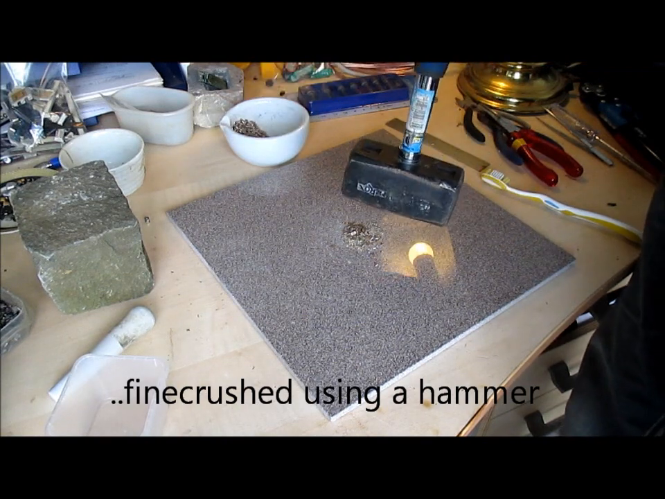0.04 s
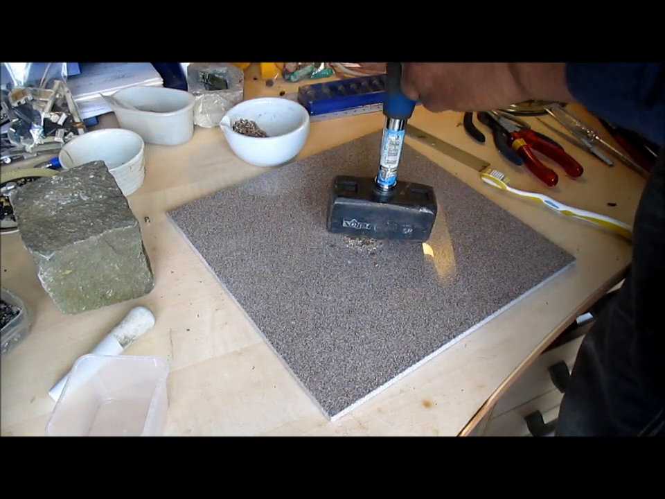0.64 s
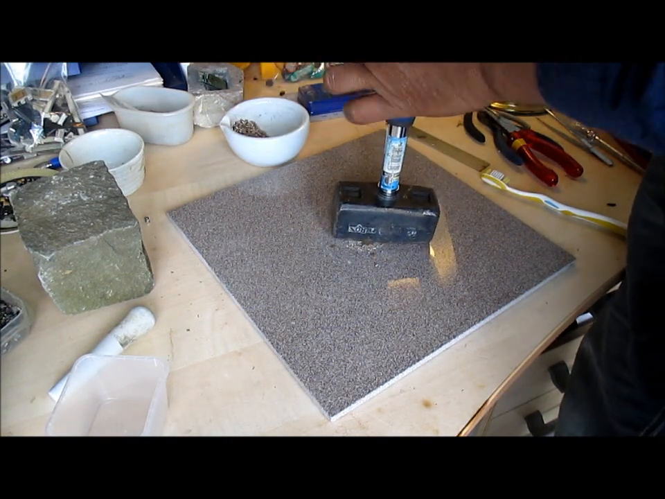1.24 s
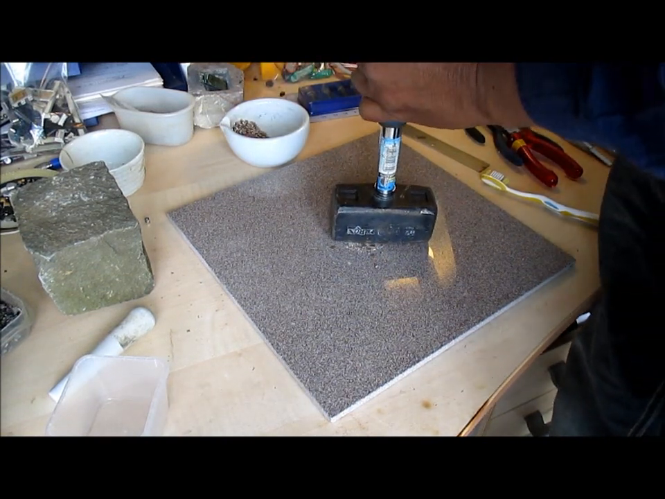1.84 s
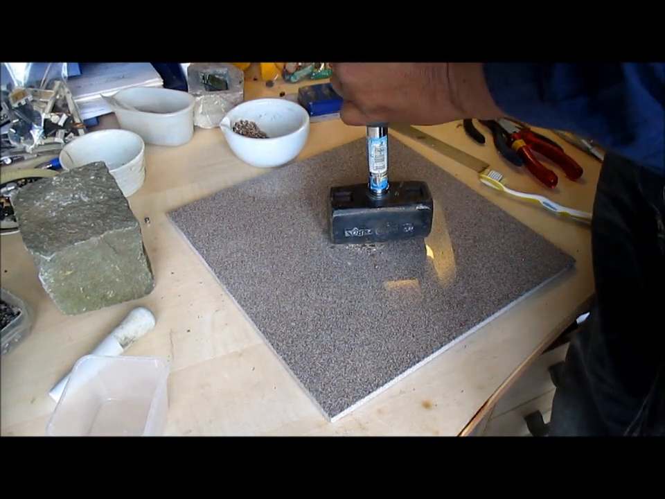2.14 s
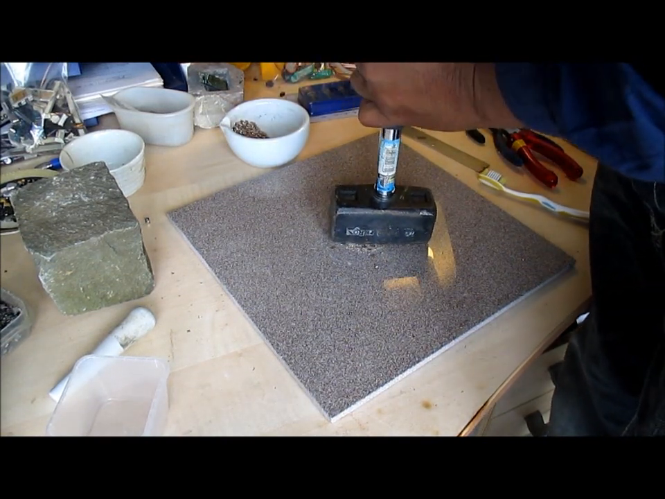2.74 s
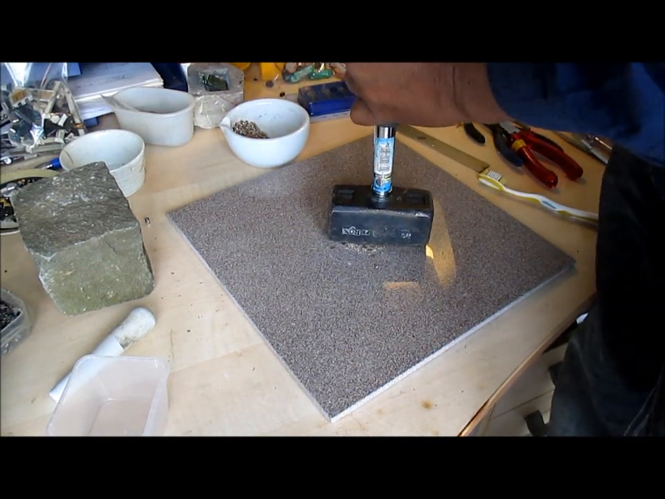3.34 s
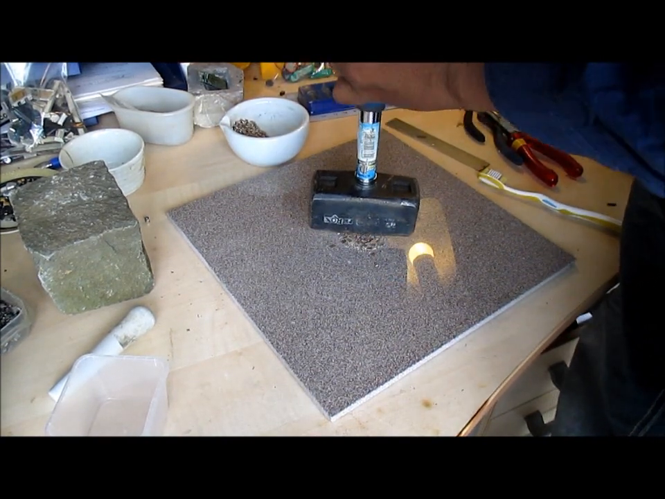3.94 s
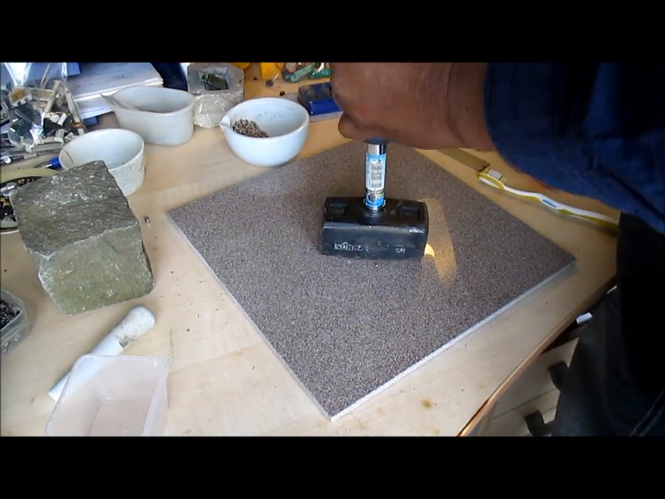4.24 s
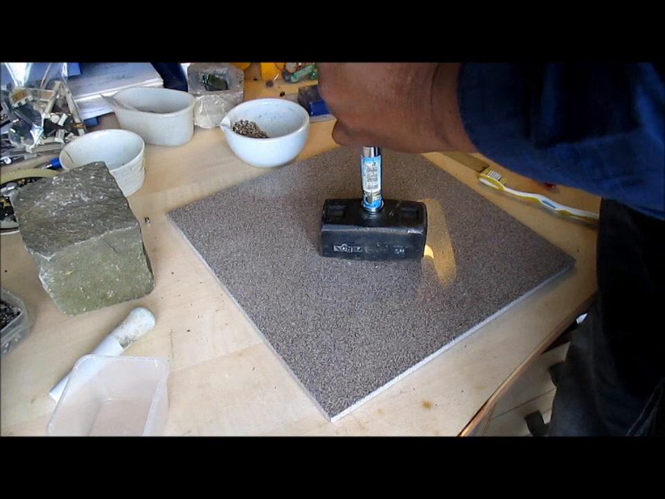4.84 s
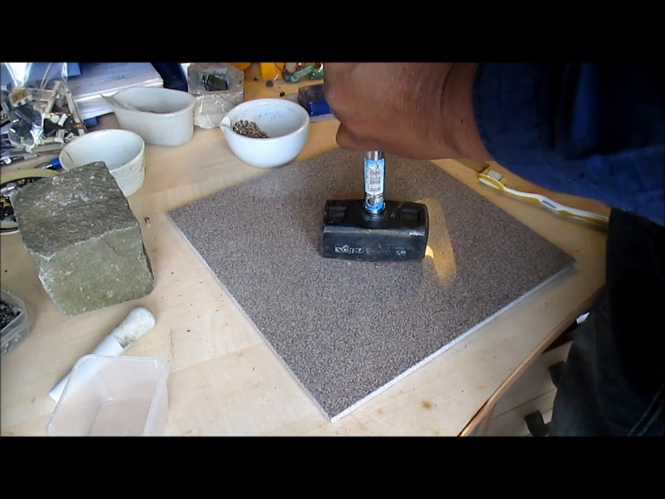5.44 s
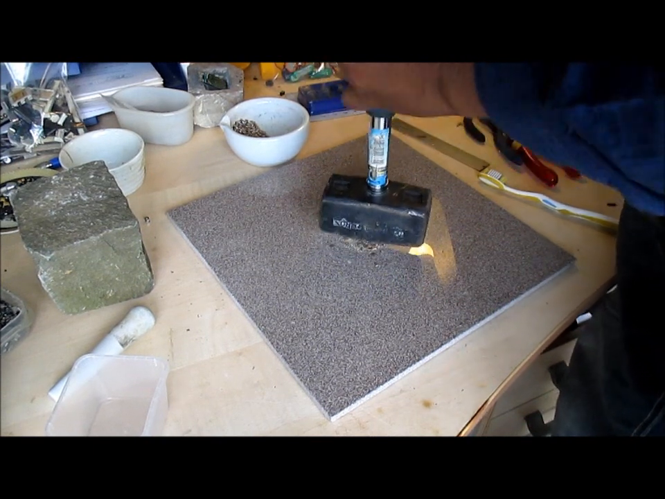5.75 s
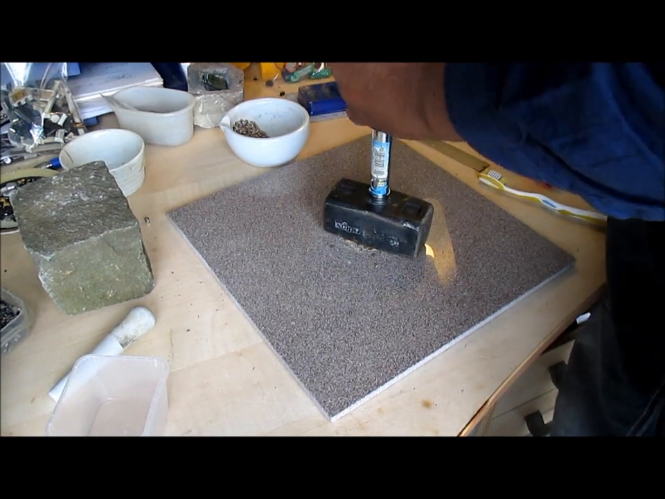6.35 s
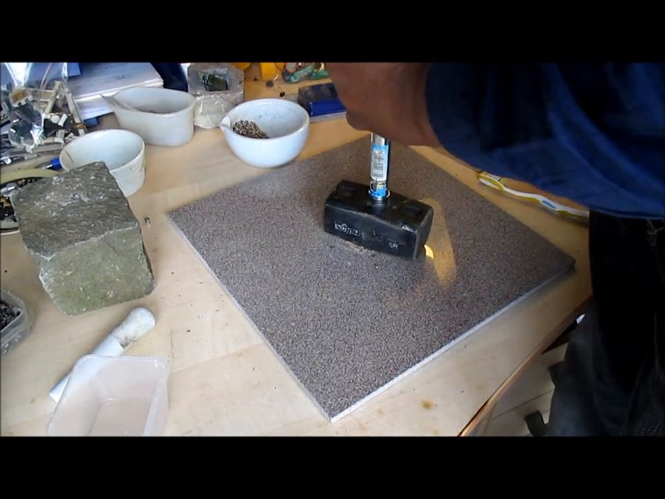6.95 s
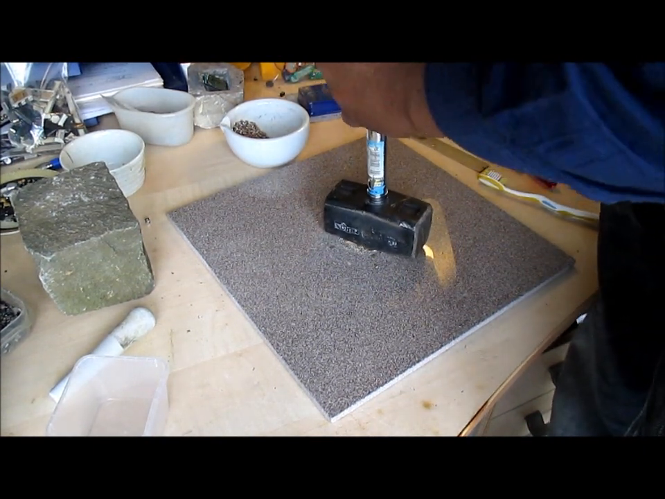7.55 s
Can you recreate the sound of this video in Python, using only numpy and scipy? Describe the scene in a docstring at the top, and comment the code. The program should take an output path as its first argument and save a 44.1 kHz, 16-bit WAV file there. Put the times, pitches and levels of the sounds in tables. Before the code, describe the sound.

Soft room tone opens, close up in a small workshop. From about 0.9 seconds a heavy steel hammer head taps lightly on scrap on a stone slab, then lands at 1.35 with a thud, a bright clink and a short boom from the wooden bench. From 1.5 to 3.6 it presses and rocks: brittle pieces snap and crumble in dense, uneven, gritty crackles, with a few duller knocks and a faint grumble. After a short lull the head lands hard again at 4.25, followed by sparser crunching and a sharp crack near 5.3. Another brief pause leads to a third clinking landing at about 6.2, then steady irregular snapping and grinding until the end at about 7.6. Each snap rings briefly in steel and stone with a short room echo. A faint thin sizzle rises around the main landings.

```python
"""A heavy hammer head crushes brittle scrap on a stone slab: set down three times, pressed and rocked.
Pieces snap and crumble to grit, and every snap rings steel and stone, tinted by how the head sits.
Each landing thuds, knocks and rattles the loose bits; the slab rings and the wooden bench booms below.
Bare steel clinks on stone, and the rolling head grumbles. Behind it sit a thin sizzle, soft room tone
and the short echo of a small workshop. The perspective is close and nearly mono."""
import sys
import numpy as np
from scipy import signal
from scipy.fft import rfft, irfft
from scipy.io import wavfile

SR = 44100
rng = np.random.default_rng(int(sys.argv[2]) if len(sys.argv) > 2 else 0)


def master(y):
    """Save y as 16-bit WAV."""
    cut = np.clip(np.atleast_2d(y).T, -1, 1)
    pcm = np.round(cut * 32767)  # scale
    wavfile.write(sys.argv[1], SR, pcm.astype(np.int16))


N = 334719
TIME = np.arange(N) / SR

# colour of the room tone: (frequency [Hz], density [dB])
ROOM_TONE_COLOUR = [(30, -11), (59, -9), (245, -6), (473, -3.5), (962, -8.5), (1190, -11), (2230, -16.5),
                    (2900, -18.5), (3580, -18.5), (4080, -21.5), (16000, -44)]
# the room tone sinks under the work and creeps back in the pauses: (time [s], level [dB])
ROOM_TONE_FADER = [(0, -47), (1.4, -43), (3.6, -56.5), (4.25, -46.5), (5.15, -55.5), (6.12, -47),
                   (6.25, -51), (7.59, -49.5)]
# colour of the microphone hiss: (frequency [Hz], density [dB])
HISS_COLOUR = [(30, 9), (200, 16), (1000, -35.5), (5000, 15.5), (10000, 17.5), (16000, 16.5)]
# colour of the thin sizzle: (frequency [Hz], density [dB])
SIZZLE_COLOUR = [(100, -49), (1500, -12), (2500, -9.5), (3600, -11), (4300, -3), (5150, -9.5), (5800, -22),
                 (9000, -30), (16000, -60)]
# swells of sizzle around the landings: (start [s], length [s], level [dB])
SIZZLE_CUES = [(1.41, 0.89, -48.5), (4.015, 0.43, -49), (4.394, 0.073, -53.5), (6.056, 0.2, -47)]
# reverb of the workshop: (band centre [Hz], time to fall 60 dB [s], level [dB])
REVERB_BANDS = [(124, 0.19, -26), (332, 0.41, 5), (750, 0.22, 1), (1970, 0.38, -2.5), (3430, 0.58, -12),
                (6450, 0.33, -4.5), (13000, 0.19, -3)]
# modes of the wooden bench: (frequency [Hz], bandwidth [Hz], level [dB])
BENCH_MODES = [(57.5, 5.7, -10.5), (79.5, 11, -12), (119.3, 4.3, 4), (160.7, 3.6, 8), (193.4, 3.14, 9),
               (222.5, 27, -2.5), (278, 9.3, -4.5), (291.6, 13, -0.5), (333, 9, -5.5)]
# bending modes of the slab: (frequency [Hz], bandwidth [Hz], level [dB])
SLAB_MODES = [(404, 16, -5), (441, 17, -6), (511, 10, -1), (537, 14, -2), (654, 18, -7), (772, 8, 3),
              (865, 20, -2), (975, 18, -4), (1058, 15, 1), (1210, 18, -7), (1310, 12, -4), (1400, 13, -6),
              (1484, 11, -2), (1642, 20, -7), (1760, 16, -4), (2844, 30, -8), (2999, 25, -9)]
# modes of steel and stone pressed together: (frequency [Hz], bandwidth [Hz], level [dB])
CONTACT_MODES = [(358, 44, -11.5), (399, 31, -3), (493.4, 92, -0.5), (700, 225, 3.5), (908, 442, 0.5),
                 (1262, 176, 3.5), (1560, 220, 1), (1854, 297, -1.5), (2386, 376, -3.5), (2810, 394, 3.5),
                 (3233, 604, 2), (3830, 777, -1), (4450, 277, -3), (4820, 118, -5.5), (5580, 150, -8),
                 (6120, 140, -14.5), (6560, 113, -5), (7400, 150, -17.5), (7870, 80, -10),
                 (8430, 66, -14.5), (8950, 86, -14), (9850, 130, -17), (10270, 110, -19),
                 (10980, 70, -24.5), (11700, 40, -20.5), (11950, 60, -19.5), (12900, 92, -27),
                 (13800, 65, -42), (14600, 35, -57)]
# modes of the clinking head: (frequency [Hz], bandwidth [Hz], level [dB])
CLINK_MODES = [(2764, 93, -1.5), (2850, 140, -4), (3600, 110, -2.5), (3880, 85, -2), (4780, 100, -9.5),
               (5530, 140, -17)]
# bare steel touches stone: (time [s], level [dB])
CLINK_CUES = [(0.887, -23), (0.894, -15.5), (0.97, -23), (1.025, -18), (1.126, -12.5), (1.279, -23),
              (1.351, -4.5), (4.246, -0.5), (6.163, -11), (6.179, -6.5)]
# the head rolls under load: (start [s], length [s], level [dB], pitch [Hz])
ROLL_CUES = [(1.517, 0.3, -45.5, 120.5), (2.166, 0.15, -43, 196), (3.05, 0.3, -54, 161.7),
             (6.07, .08, -43, 403), (6.097, 0.081, -37.5, 537)]
# the head lands or tips: (time [s], thud [dB], knock pitch [Hz], knock [dB],
# slab focus [Hz], slab [dB], bench [dB], bench focus [Hz])
LANDING_CUES = [(0.889, -18.5, 920, -23, 880, -19, -11.5, 65), (1.024, -11.5, 875, -11, 880, -11, -25, 281),
                (1.126, -12.5, 945, -15, 865, -12, -23.5, 142), (1.340, -6, 630, 0, 1050, -3, 1, 180),
                (1.351, 1.5, 1675, 5, 1650, -5, 3, 170), (1.355, -7, 1020, 0, 453, 5.5, -7, 322),
                (1.528, -7, 426, -9, 420, -10, -7, 320), (1.541, -5, 1080, -3.5, 1060, -8, -3, 115),
                (1.699, -14.5, 1670, -3.5, 1750, -15, -10, 113), (1.701, -12, 560, -6, 825, -5.5, -22, 160),
                (1.82, -14, 620, -28, 448, -23, -14, 120), (2.582, -13.5, 890, -7, 560, -16, -15, 165),
                (2.628, -6, 843, -1, 900, -7, -11.5, 126), (3.284, -12, 1160, -1.5, 1240, -10, -20, 165),
                (3.808, -27.5, 870, -26.5, 696, -27, -15.5, 169),
                (4.024, -29, 313, -13, 424, -24, -5.5, 306), (4.2447, -2, 426, 0, 510, 3.5, 0, 231),
                (4.2458, 1.5, 1620, 6.5, 1470, 2.5, -7, 77.5), (4.256, 2.5, 560, -3, 725, 9, -8, 164.5),
                (4.309, -5, 1200, -13, 1400, -9, -1.5, 171.5), (4.476, -2, 1100, -6.5, 801, -8, -12, 166),
                (5.328, -13, 1130, -16, 1200, -19, -11, 196), (5.723, -30, 700, -34, 500, -22, -13, 188),
                (6.06, -25, 586, -27, 420, -23, -8.5, 238), (6.162, -3, 453, 5, 500, 5.5, 1, 124.2),
                (6.177, 2.5, 1000, 6, 1025, -4, -2, 63.7), (6.222, -12, 430, -11, 420, -8, -1.5, 230),
                (6.259, -3.5, 940, -1, 540, -3, -16, 203)]
# the hand bears down on the head: (start [s], length [s], pressure [dB])
PUSH_CUES = [(1.504, 0.091, -4.5), (1.869, .18, -4.5), (2.252, 0.068, 0.5), (2.474, 0.13, -5),
             (2.805, 0.28, -8), (3.109, 0.25, -11), (4.437, 0.067, -3), (4.829, 0.13, -10),
             (6.238, 0.31, -13.5), (6.641, 0.08, -11), (6.731, 0.093, -9), (7.017, .14, -4.5),
             (7.248, 0.17, -7), (7.541, 0.042, -5.5)]
# the larger pieces snap: (time [s], relative level [dB], low-end weight [dB], crumbliness [0-1])
SNAP_CUES = [(0.893, -34, -19, 0.96), (1.129, -31, -28.5, 0.95), (1.279, -34, 0, 1), (1.352, -30, -4, 0.3),
             (1.381, -45, 3, 0), (1.514, -27.5, -1, 0.9), (1.529, -17.5, -6.5, 0.26),
             (1.541, -12.5, -10.5, 0.96), (1.558, -25, 5.5, 1), (1.613, -36, 6.5, 0.2),
             (1.79, -30, -26, 0.6), (1.873, -16, -1.5, 0.46), (1.908, -20.5, -10, 0.05),
             (1.915, -24.5, -4, 0), (1.929, -21.5, 1, 0), (1.944, -26.5, 5, 0.34), (1.971, -16, -6, 0.57),
             (1.988, -26, -15, 0.5), (2.017, -22, -7, 0.85), (2.051, -15, -6.5, 0.27),
             (2.117, -20, -12.5, 0.2), (2.193, -23.5, -5, 0.9), (2.254, -20, -8, 1),
             (2.267, -20.5, -8, 0.8), (2.277, -21, -11, 1), (2.289, -20.5, -5.5, 0.6),
             (2.359, -15.5, -14, 0.8), (2.365, -18.5, -9.5, 0.7), (2.406, -13.5, -7.5, 0.1),
             (2.455, -23, -10, 0.5), (2.459, -19.5, -5, 0.56), (2.506, -17, -8, 0),
             (2.514, -15.5, -7, 0.56), (2.527, -21, -5.5, 0), (2.533, -19, -5.5, 0),
             (2.560, -19.5, -10, 0.55), (2.570, -16, -4.5, 0), (2.581, -17, -2, 0), (2.609, -13, -9, .4),
             (2.617, -17.5, -4.5, 0), (2.738, -19.5, -10, 0.45), (2.805, -25.5, -5.5, 1),
             (2.82, -25, -9, 0.96), (2.851, -17.5, -7.5, 0.65), (2.935, -14.5, -14.5, 0.78),
             (2.938, -17.5, -3.5, 0.34), (2.989, -25, -4.5, 1), (3.025, -19, -18, 0),
             (3.035, -15, -6, 0.46), (3.109, -26, -7.5, 0.37), (3.137, -21, -8, 0.53),
             (3.144, -20, -5.5, 0.38), (3.18, -21, -5.5, 0.65), (3.214, -31, -8, 0.1),
             (3.223, -15, -9.5, 0.27), (3.283, -14.5, -5, 0.65), (3.319, -27, -19, 0.2),
             (3.330, -26.5, -9, 0.14), (3.361, -18, -8, 0.64), (3.556, -25, -10, 0.8),
             (3.585, -31, -6.5, 0.6), (4.025, -34, -1.5, 0.2), (4.247, -24, 0, 0.65),
             (4.461, -25.5, -7, 0.9), (4.474, -13, -8, 0.76), (4.482, -16.5, -16, 0), (4.503, -29, -5, 0.5),
             (4.546, -17.5, -8.5, 0.82), (4.701, -25.5, -17, 0.65), (4.738, -29.5, -11, 1),
             (4.787, -29, -15, 0.7), (4.849, -13, -14, 0.68), (4.865, -14, -9, 0.16),
             (5.119, -31.5, -8.5, 1), (5.3279, -10.5, -10.5, 0.85), (5.378, -28.5, -6, 0.3),
             (5.462, -30, -22, 0.84), (5.488, -27.5, -15, 1), (5.566, -32.5, -6.5, 1), (6.159, -27, 3, 1),
             (6.257, -14, -7, 0.3), (6.318, -16.5, -7, 0.05), (6.348, -13.5, -10, 0.4),
             (6.381, -27, -21, 0.7), (6.416, -15.5, -5.5, 0.8), (6.464, -15, -5, 0.13),
             (6.477, -15.5, -8.5, 0.2), (6.6772, -20, -6.5, 0.2), (6.740, -15, -9.5, 0.2),
             (6.755, -14.5, -13.5, 0), (6.775, -29, -8, 0.18), (6.800, -23.5, -8.5, 0.4),
             (6.824, -15, -4.5, 0.02), (6.832, -22.5, -19, 0), (6.93, -34, -10, 0.3),
             (6.967, -27.5, -5.5, 0.71), (6.997, -16.5, -6, 0.34), (7.032, -31, -13, 0.3),
             (7.056, -27, -12, 0.16), (7.071, -18.5, -7, 0.77), (7.095, -18, -7.5, 0.55),
             (7.108, -26, -14, 0.6), (7.127, -29, -9, 0.7), (7.137, -21.5, -19, 0), (7.164, -28, -10, 0.1),
             (7.205, -28, -9, 0.1), (7.237, -14.5, -10.5, 0.3), (7.274, -31, -10, 0.2),
             (7.306, -13.5, -12, 0.2), (7.386, -14, -7, 0.27), (7.503, -30.5, -5.5, 1),
             (7.57, -22.5, -5.5, 0.8)]


def undb(db):
    """Decibels to gain."""
    return 10 ** (np.asarray(db) / 20)


def unit(x):
    """Scale each sound to an energy of one."""
    return x / np.sqrt(np.sum(x ** 2, axis=-1, keepdims=True) + 1e-18)


def add(track, s, sound):
    """Mix a sound into a track at a time."""
    i = min(int(s * SR), N)
    track[i:i + len(sound)] += sound[:N - i]


def cut(x, hz, kind, order=2):
    """Low-pass or high-pass."""
    return signal.sosfilt(signal.butter(order, min(hz, SR / 2 - 1), kind, fs=SR, output="sos"), x)


def through(x, response):
    """Play a sound through an impulse response."""
    return signal.fftconvolve(x, response)[:N]


def noise(colour):
    """Coloured noise with an rms of one."""
    hz, db = np.transpose(colour)
    gain = undb(np.interp(np.log(np.fft.rfftfreq(N, 1 / SR) + 1), np.log(hz), db))
    return unit(irfft(rfft(rng.standard_normal(N)) * gain, N)) * np.sqrt(N)


def swell(start_s, length_s, attack_s, release_s):
    """Envelope that rises, holds and dies away."""
    since = TIME - start_s
    return np.clip(since / attack_s, 0, 1) * np.exp(-np.maximum(since - length_s, 0) / release_s)


def ring(modes):
    """Impulse response of damped modes; neighbours swing in opposite directions."""
    t = TIME[:SR // 2]
    response = 0
    for k, (hz, width, db) in enumerate(modes):
        gain = (-1) ** k * undb(db) * 2 * np.pi * width / SR
        response += gain * np.exp(-np.pi * width * t) * np.cos(2 * np.pi * hz * t)
    return response


def hard_attack(response):
    """The same colour with its energy packed at the start (minimum phase), as in a hard contact."""
    size = len(response)
    cepstrum = irfft(np.log(np.abs(rfft(response)) + 1e-4), size)
    cepstrum[1:size // 2] *= 2
    cepstrum[size // 2 + 1:] = 0
    return irfft(np.exp(rfft(cepstrum)), size)


def room_tone():
    """The soft rush of the room, riding slowly up and down."""
    fader_db = np.interp(TIME, *np.transpose(ROOM_TONE_FADER))
    return cut(noise(ROOM_TONE_COLOUR), 25, "high") * undb(fader_db)


def sizzle(attack_s=0.018, release_s=0.24):
    """A thin, even hiss comes up around the main landings and fades."""
    envelope = sum(undb(db) * swell(s, length, attack_s, release_s) for s, length, db in SIZZLE_CUES)
    return noise(SIZZLE_COLOUR) * envelope


def workshop_reverb(build_s=0.0016, scatter_db=-4, scatter_s=0.0058, scatter_hz=2200):
    """Impulse response: dull scatter off the cluttered bench top, then the room's short tail."""
    t = TIME[:int(SR * .7)]
    hz, t60, db = np.transpose(REVERB_BANDS)
    white = rfft(rng.standard_normal(len(t)))
    log_hz = np.log(np.fft.rfftfreq(len(t), 1 / SR) + 1)
    tail = 0
    for k, share in enumerate(np.eye(len(hz))):
        band = irfft(white * np.interp(log_hz, np.log(hz), share), len(t))
        envelope = unit(undb(-60 * t / t60[k]) * (1 - np.exp(-t / build_s)))
        tail += band * undb(db[k]) * envelope
    scatter = unit(rng.standard_normal(len(t)) * t * np.exp(-2 * t / scatter_s))
    return tail + undb(scatter_db) * cut(scatter, scatter_hz, "low", order=1)


def rolling(attack_s=0.067, release_s=0.07, q=13):
    """The head rolls over the scrap, and bench or slab grumbles around one mode."""
    bumps = rng.standard_normal(N)
    out = np.zeros(N)
    for start, length, db, hz in ROLL_CUES:
        mode = unit(cut(ring([(hz, hz / q, 0)]), 2 * hz, "low"))
        out += undb(db) * swell(start, length, attack_s, release_s) * through(bumps, mode)
    return out


def struck_spot(modes, focus_hz, octave_off_db):
    """The spot that is hit favours the modes near one pitch."""
    focused = [(hz, width, db + octave_off_db * np.log2(hz / focus_hz) ** 2) for hz, width, db in modes]
    return unit(ring(focused))


def slab_and_bench():
    """After each landing the slab rings on a few clear modes and the bench booms underneath."""
    out = np.zeros(N)
    for s, _, _, _, slab_hz, slab_db, bench_db, bench_hz in LANDING_CUES:
        slab = struck_spot(SLAB_MODES, slab_hz, octave_off_db=-70)
        bench = struck_spot(BENCH_MODES, bench_hz, octave_off_db=-14)
        add(out, s, cut(slab, 2 * slab_hz, "low") * undb(slab_db))
        add(out, s, cut(bench, 600, "low") * undb(bench_db))
    return out


def clinks(top_hz=5500):
    """Bare steel touches the stone and gives a short, bright ring."""
    out = np.zeros(N)
    clink = unit(cut(ring(CLINK_MODES), top_hz, "low"))
    for s, db in CLINK_CUES:
        add(out, s, clink * undb(db))
    return out


def debris(hardness, decay_s=0.026, spread_db=4, low_hz=1500, high_hz=3300):
    """Loose scrap rattles briefly under a landing head, louder after a hard blow."""
    t = TIME[:SR // 6]
    jolts, size = rng.standard_normal((2, len(t)))
    rattle = jolts * undb(spread_db * size) * np.exp(-t / decay_s)
    rattle = cut(cut(rattle, low_hz, "high"), high_hz, "low", order=5)
    return unit(rattle) * undb(-10 + 6 * hardness)


def fracture(decay_ms, crumble=0, crumble_s=0.0033, linger_s=0.007, spread_db=4):
    """A crack is a dying volley of tiny uneven breaks; a crumbly piece goes on breaking."""
    t = TIME[:SR // 30]
    jolts, size = np.moveaxis(rng.standard_normal(np.shape(crumble) + (2, len(t))), -2, 0)
    crack = np.exp(-t * 1000 / max(decay_ms, .1))
    crumbly = np.clip(np.asarray(crumble)[..., None], 0, 1)
    crumbling = crumbly ** 2 * np.exp(-t / (crumble_s + crumbly ** 4 * linger_s))
    return jolts * undb(spread_db * size) * (crack + crumbling)


def landings(contact_ms_at_1khz=2.8, knock_q=4):
    """The head thuds and bounces on the springy scrap with a short pitched knock; loose bits rattle."""
    body = hard_attack(ring(CONTACT_MODES))[:SR // 20]
    out = np.zeros(N)
    for s, thud_db, knock_hz, knock_db, *_ in LANDING_CUES:
        # a higher knock means a shorter, harder contact: brighter and louder
        hardness = np.log2(knock_hz / 1000)
        contact_ms = contact_ms_at_1khz / 2 ** (0.16 * hardness)
        top_hz = 2400 * np.sqrt(2 / contact_ms)
        force = cut(cut(fracture(contact_ms), top_hz, "low", order=3), 110, "high")
        add(out, s, unit(through(force, body)) * undb(thud_db + 0.5 + 3 * hardness))
        bounce = ring([(knock_hz, knock_hz / knock_q, 0)])[:SR // 20]
        knock = unit(through(bounce, bounce))  # ringing it twice rounds the attack
        add(out, s, knock * undb(knock_db))
        add(out, s, debris(hardness) * undb(thud_db))
    return out


def grit(grains_per_s=1100, level_db=-29, spread_db=4.5, avalanche_s=.006):
    """Countless small grains give way in little avalanches while the head bears down."""
    fires = rng.random(N) < grains_per_s / SR
    size_db = spread_db * np.minimum(rng.standard_normal(N), 1.5)
    sign = rng.choice([-1, 1], N)
    knots = np.arange(0, TIME[-1], avalanche_s)
    avalanche_db = np.interp(TIME, knots, rng.uniform(-6.4, 7.6, len(knots)))
    grains = unit(fires * sign * undb(size_db + avalanche_db)) * np.sqrt(N)
    pressure = sum(undb(db) * swell(start, length, attack_s=0.0077, release_s=0.031)
                   for start, length, db in PUSH_CUES)
    crackle = grains * pressure * undb(level_db)
    coarse = cut(crackle, 900, "high", order=1)
    fine = cut(crackle, 5000, "high", order=1)
    return coarse + undb(-3) * fine


def crumb_cues(per_s=40, level_db=-29, spread_db=9.5, weight_db=-5, crumble=0.49):
    """Cues for small snaps scattered over each push, louder under more pressure."""
    chance = rng.random(size=(len(PUSH_CUES), 24, 2))
    return [(start + when * length, level_db + db + spread_db * (2 * size - 1), weight_db, crumble)
            for (start, length, db), draws in zip(PUSH_CUES, chance)
            for when, size in draws[:round(length * per_s)]]


def slab_reflection(ticks, lag_s=.00102, share=.7):
    """Each tick plus its mirror image off the polished slab."""
    delayed = np.pad(ticks, ((0, 0), (int(lag_s * SR), 0)))[:, :ticks.shape[1]]
    return ticks + share * delayed


def snaps(body, cues, crack_ms=0.34, sparkle_ms=1.0, split_hz=2100, top_hz=5500, splinter_s=0.02):
    """Each snap is a sharp tick, a sparkle and the duller push of the head dropping into the gap."""
    times, db, weight_db, crumble = np.transpose(cues)
    tick = cut(fracture(crack_ms, crumble), split_hz, "high")
    tick = slab_reflection(cut(tick, top_hz, "low", order=3))
    sparkle = cut(fracture(sparkle_ms, crumble), top_hz, "high", order=4)
    sparkle_db = 5.25 - 0.15 * db  # small pieces sparkle more for their size
    drop = cut(fracture(crack_ms, crumble), split_hz, "low", order=3)
    cracks, force = 0, np.zeros(N)
    for layer, layer_db in (tick, 13.5), (sparkle, sparkle_db), (drop, 19 + weight_db):
        # balance each layer by how loudly it rings the body
        loudness = np.linalg.norm(signal.fftconvolve(layer, body[None, :SR // 50]), axis=1)
        cracks += layer * (undb(db + layer_db) / loudness)[:, None]
    # a few splinters go just before the piece gives way, most after it
    lags = rng.normal(splinter_s, splinter_s, size=(len(times), 10))
    splinters = unit(cut(fracture(crack_ms / 2, np.zeros_like(lags)), split_hz, "high"))
    for k, s in enumerate(times):
        add(force, s, cracks[k])
        for lag, splinter in zip(lags[k], splinters[k]):
            add(force, s + lag, splinter * undb(db[k] - 3.5))
    return force


def head_seat(shift, low_hz, broad_hz=150, tint_db=3.5):
    """Steel and stone ring for one seat of the head: broad modes shift, each half octave is tinted."""
    modes = [(hz * (1 + shift * (width > broad_hz)), width, db) for hz, width, db in CONTACT_MODES]
    response = cut(ring(modes), low_hz, "high")
    knots_hz = np.geomspace(300, 14000, 12)
    knots_db = rng.uniform(-tint_db, tint_db, len(knots_hz))
    tint = undb(np.interp(np.fft.rfftfreq(len(response), 1 / SR), knots_hz, knots_db))
    return hard_attack(irfft(rfft(response) * tint, len(response)))


def crushing(slab_db=-12, bench_db=-8, low_hz=140, seat_count=7, max_shift=.025, rock_s=.05):
    """Snaps, crumbs and grit ring steel, stone and bench as the head rocks from seat to seat."""
    support = undb(slab_db) * ring(SLAB_MODES) + undb(bench_db) * cut(ring(BENCH_MODES), low_hz, "high")
    seats = [head_seat(shift, low_hz) for shift in np.linspace(-max_shift, max_shift, seat_count)]
    crackle = grit() + snaps(seats[seat_count // 2], crumb_cues())
    seat_now = (TIME // rock_s) % seat_count
    out = np.zeros(N)
    for k, body in enumerate(seats):
        # the big snaps take the seats in turn; the crackle moves on every rock_s
        force = snaps(body, SNAP_CUES[k::seat_count]) + crackle * (seat_now == k)
        out += through(force, body + support)
    return out


def scene(hit_send_db=-3, hiss_db=-64, width_db=-9, width_hz=9000):
    """Crunch and landings up front in the workshop; only the hiss and the treble echo have width."""
    hits = landings() + clinks()
    background = room_tone() + sizzle()
    hiss = undb(hiss_db) * np.array([noise(HISS_COLOUR), noise(HISS_COLOUR)])
    mid_reverb, side_reverb = workshop_reverb(), workshop_reverb()
    crunch = crushing()
    # the broad slab faces the listener, so the landings are drier than the crunch
    send = crunch + undb(hit_send_db) * hits
    mid = crunch + hits + slab_and_bench() + rolling() + through(send, mid_reverb)
    side = cut(through(send, side_reverb), width_hz, "high", order=1) * undb(width_db)
    return np.array([mid + side, mid - side]) + background + hiss


def record(dry, ceiling=.5, top_hz=15800):
    """Master chain: round the highest peaks, then cut the very top."""
    rounded = ceiling * np.tanh(dry / ceiling)
    return signal.sosfilt(signal.ellip(8, .2, 70, top_hz, fs=SR, output="sos"), rounded)


dry = scene()
out = record(dry)
master(out)
```